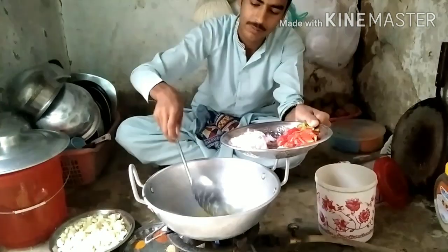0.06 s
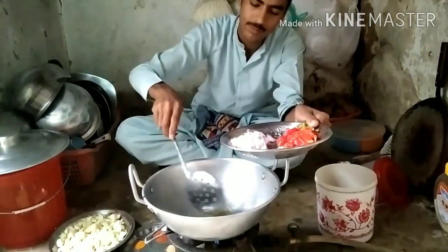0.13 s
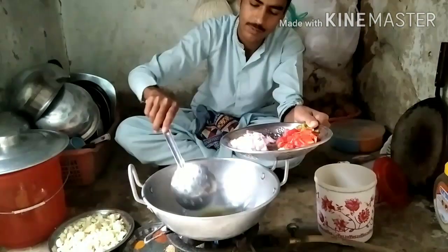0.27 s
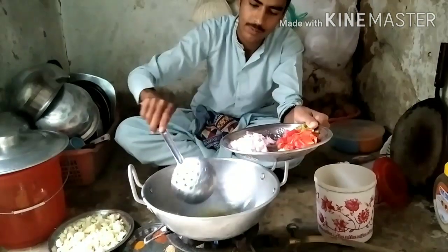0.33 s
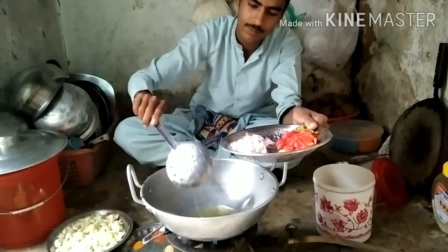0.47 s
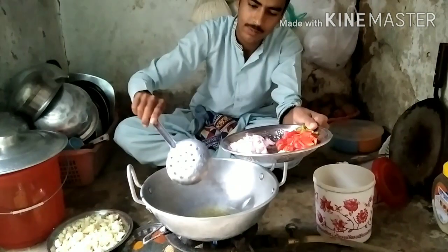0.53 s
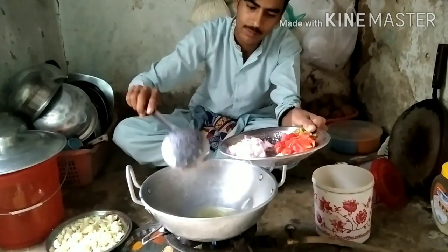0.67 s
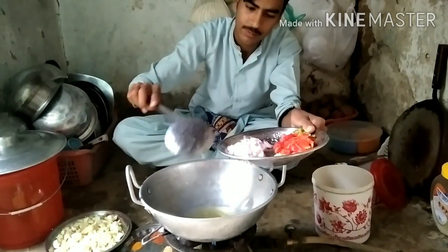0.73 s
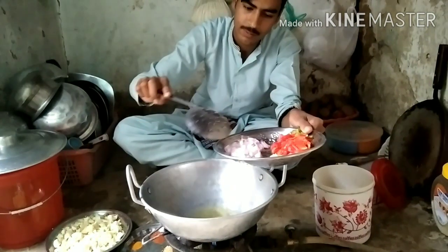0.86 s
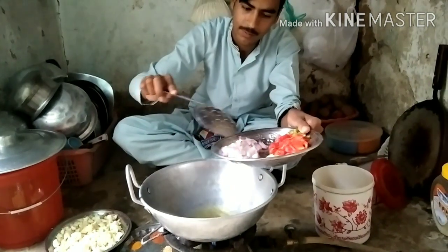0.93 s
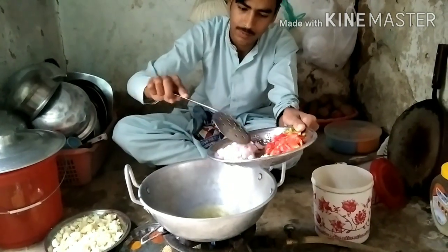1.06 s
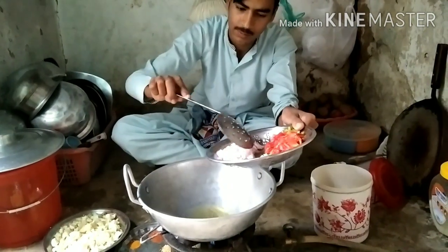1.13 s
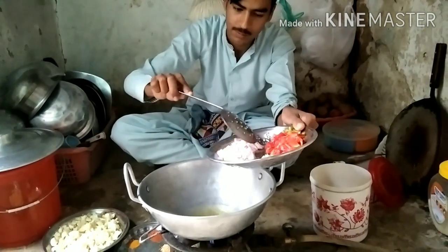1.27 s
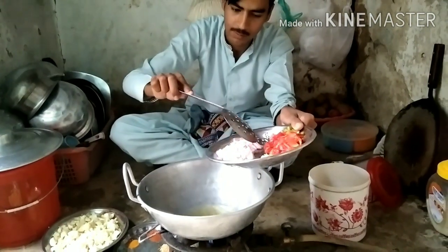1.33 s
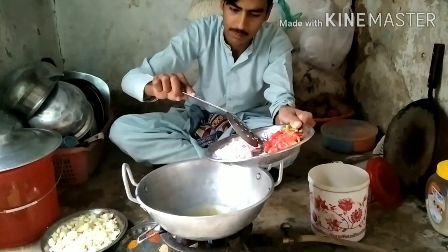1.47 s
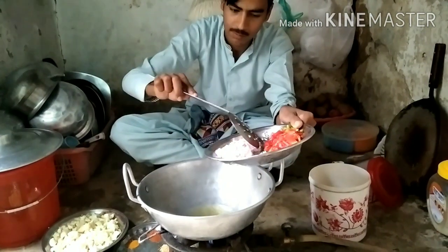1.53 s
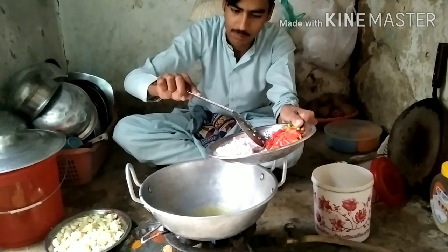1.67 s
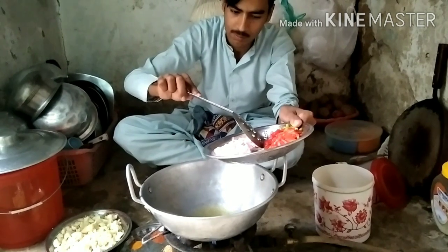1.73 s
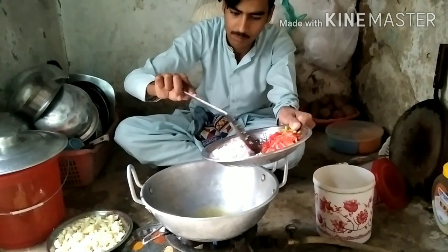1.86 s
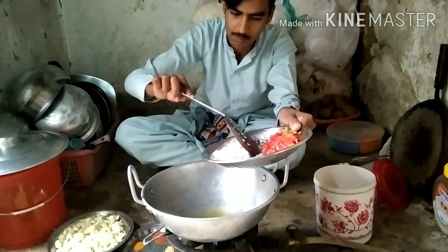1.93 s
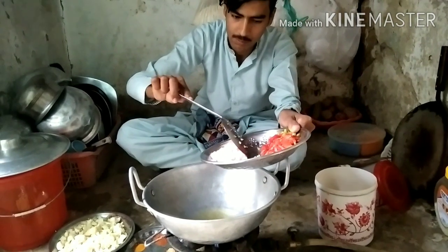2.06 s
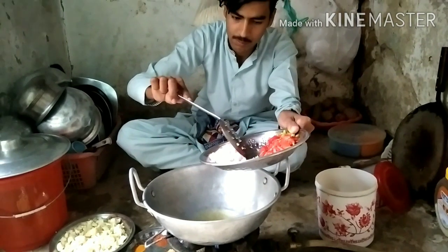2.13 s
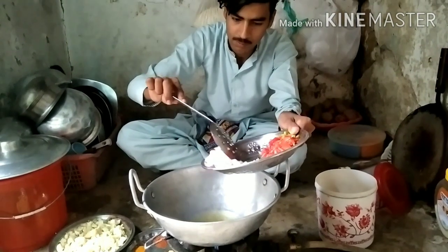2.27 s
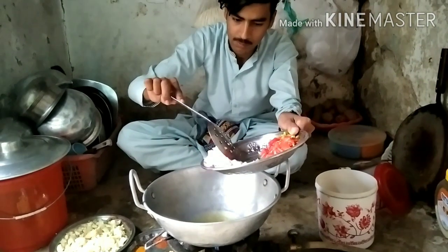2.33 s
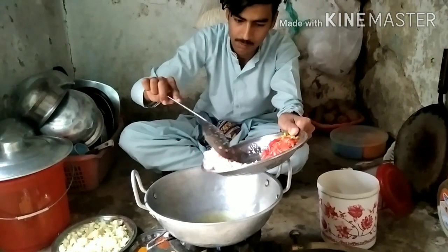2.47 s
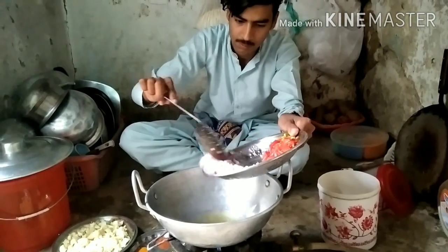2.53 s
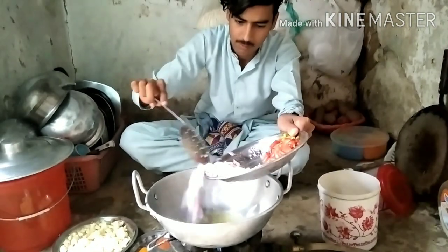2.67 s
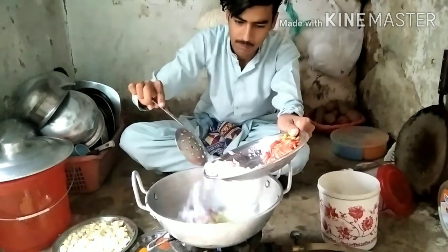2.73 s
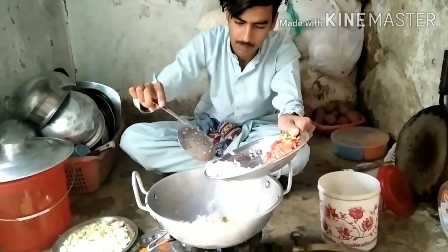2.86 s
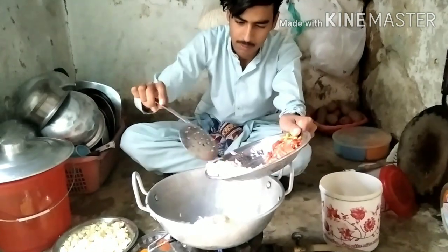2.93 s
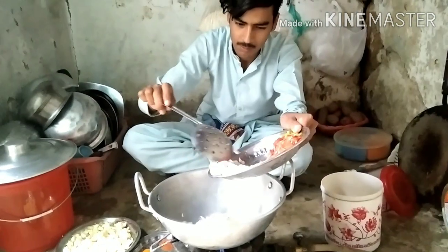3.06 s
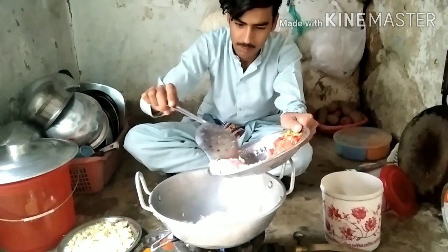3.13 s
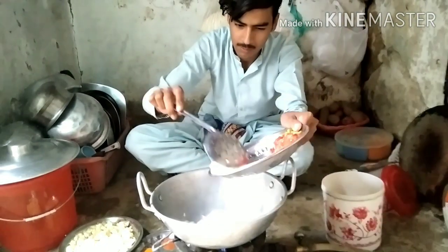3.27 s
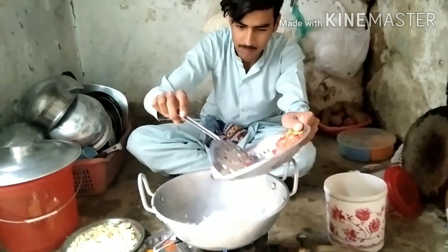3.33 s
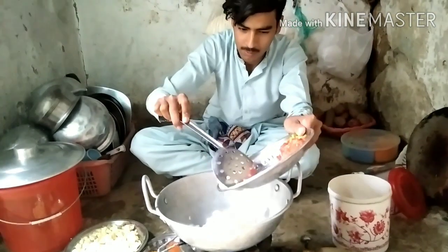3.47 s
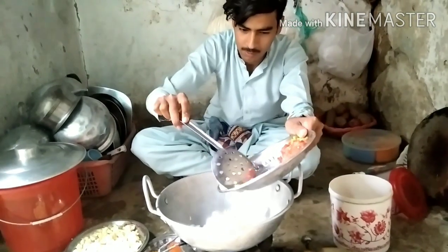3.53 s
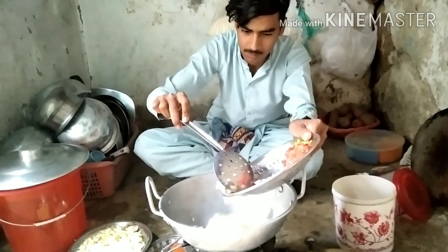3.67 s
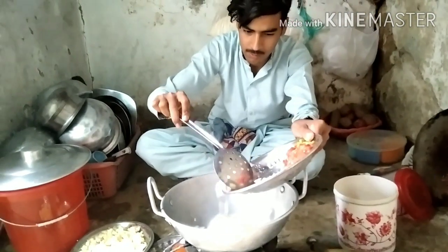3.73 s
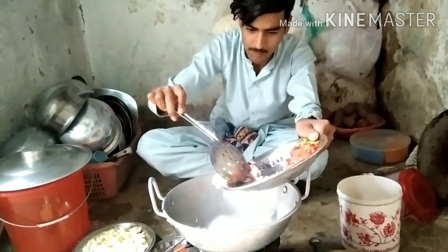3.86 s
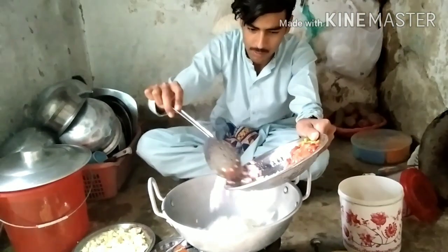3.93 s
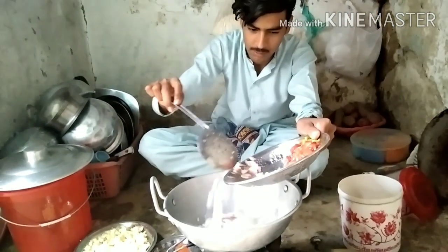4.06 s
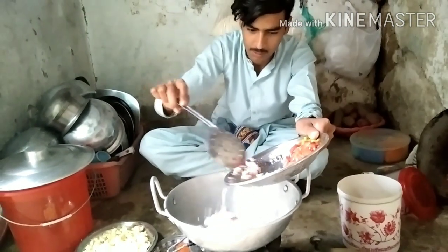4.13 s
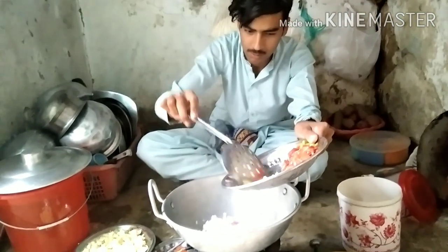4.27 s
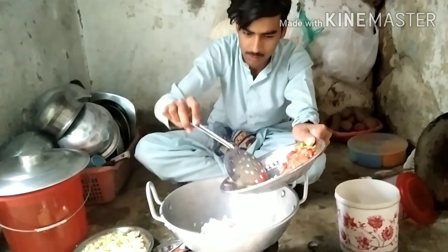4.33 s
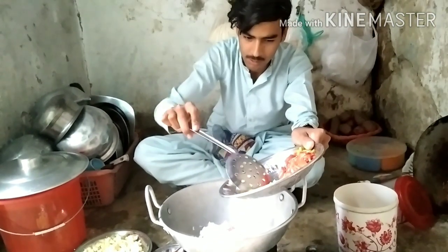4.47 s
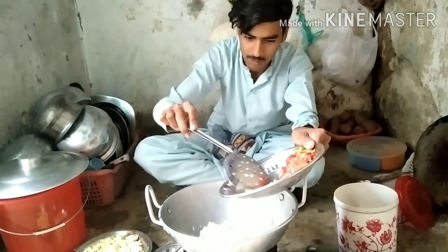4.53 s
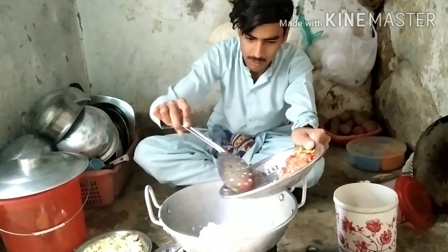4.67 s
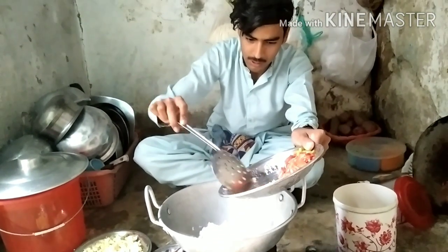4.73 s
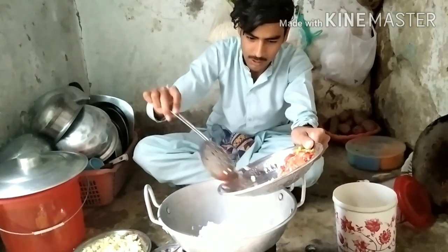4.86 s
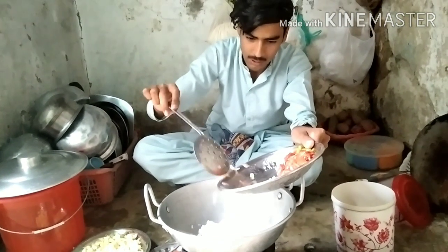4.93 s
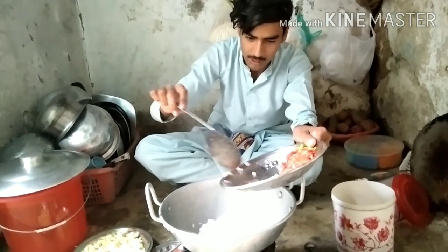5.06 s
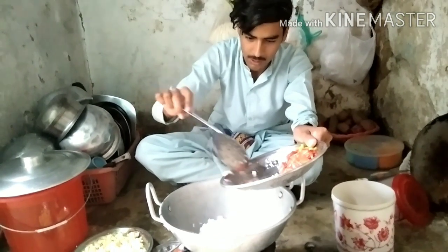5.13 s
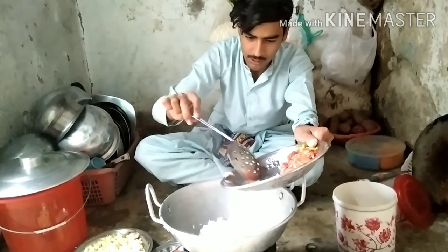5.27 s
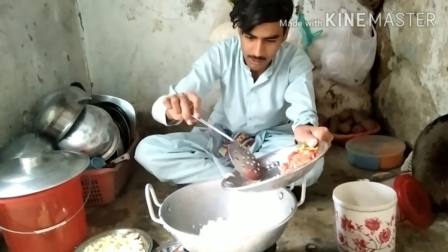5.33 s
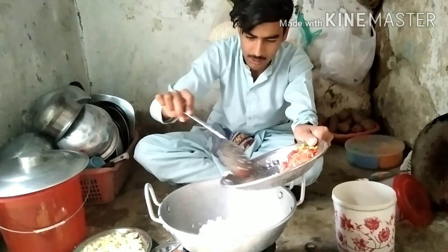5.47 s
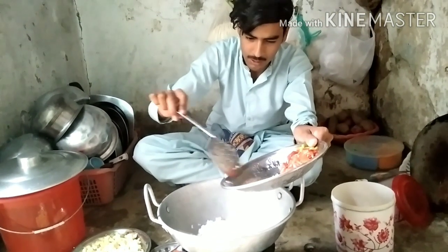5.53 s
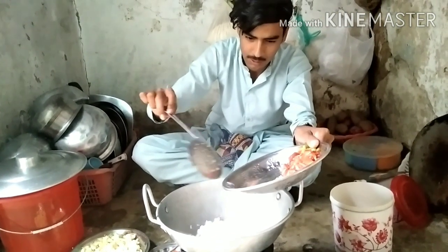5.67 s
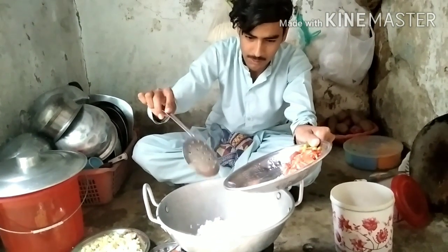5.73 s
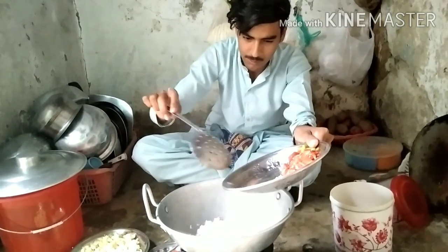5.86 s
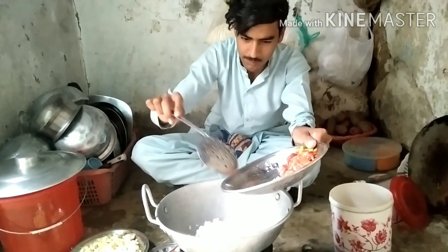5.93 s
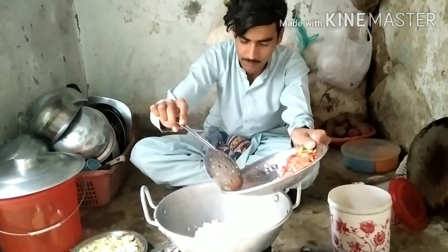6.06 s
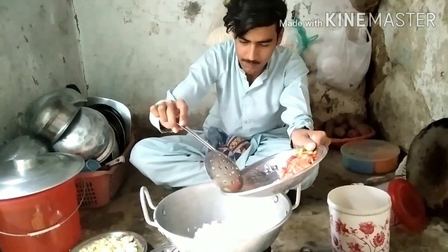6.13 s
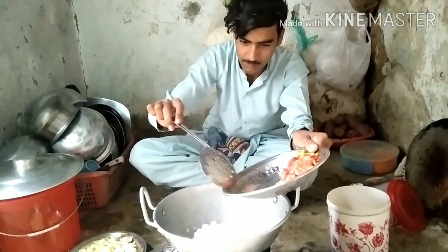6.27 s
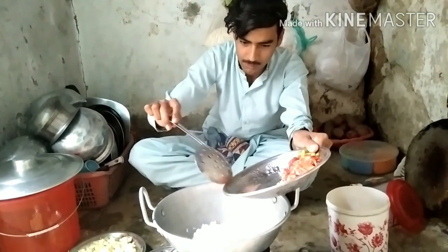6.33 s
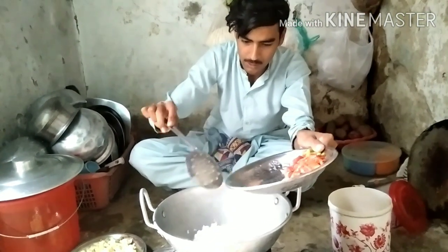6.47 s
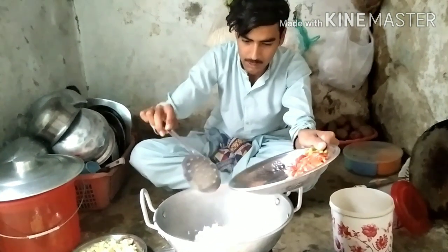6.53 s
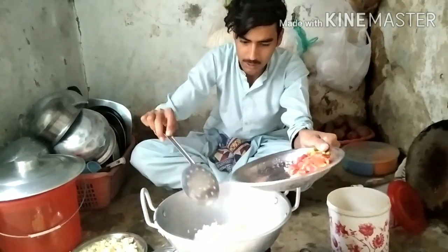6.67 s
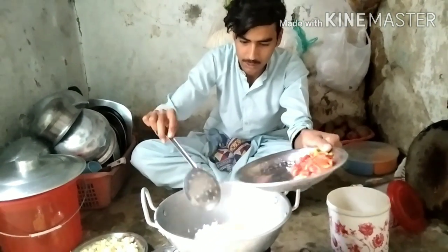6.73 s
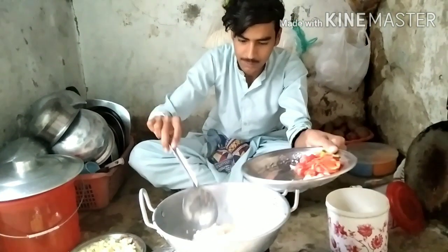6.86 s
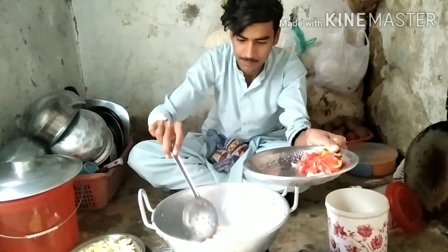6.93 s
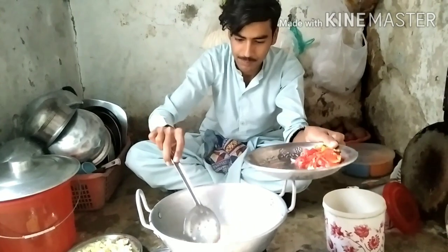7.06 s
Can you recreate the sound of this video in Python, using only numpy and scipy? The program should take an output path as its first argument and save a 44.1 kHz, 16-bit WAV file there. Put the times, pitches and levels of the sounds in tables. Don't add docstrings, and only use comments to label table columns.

```python
import sys
import numpy as np
from scipy import signal
from scipy.fft import rfft, irfft, next_fast_len
from scipy.io import wavfile

SR = 44100
rng = np.random.default_rng(int(sys.argv[2]) if len(sys.argv) > 2 else 0)


def dump_mix(stems):
    frames = np.atleast_2d(stems).T
    limited = np.clip(frames, -1, 1)
    pcm = np.round(limited * 32767).astype(np.int16)
    wavfile.write(sys.argv[1], SR, pcm)


def convert_level_to_amplitude(level_db):
    exponent = np.asarray(level_db, float) / 20
    return 10 ** exponent


N = 312669
SIZE = next_fast_len(N + SR // 10)


def in_time(rows):
    s, *columns = np.transpose(rows)
    return [np.interp(np.arange(N) / SR, s, c) for c in columns]


def at_hz(points, hz):
    point_hz, value = np.transpose(points)
    return np.interp(np.log(hz), np.log(point_hz), value)


def rms_one(x):
    return x / np.sqrt(np.mean(x ** 2) + 1e-20)


def high_pass(x, order, hz):
    return signal.sosfilt(signal.butter(order, hz, "high", fs=SR, output="sos"), x)


def drift(rate_hz):
    hop, settle = 40, 2000
    r = np.exp(-2 * np.pi * rate_hz * hop / SR)
    noise = rng.standard_normal(N // hop + settle + 2)
    slow = signal.lfilter([1], [1, -2 * r, r * r], noise)[settle:]
    return np.interp(np.arange(N) / hop, np.arange(len(slow)), rms_one(slow))


def ring(x, hz, t60_s):
    r = convert_level_to_amplitude(-60 / (t60_s * SR))
    w = 2 * np.pi * hz / SR
    return signal.lfilter([0, np.sin(w)], [1, -2 * r * np.cos(w), r * r], x + 1e-18)


def colour(x, spectrum):
    hz = np.arange(SIZE // 2 + 1) * SR / SIZE + 1
    return irfft(rfft(x, SIZE) * convert_level_to_amplitude(at_hz(spectrum, hz)), SIZE)[..., :N]


def two_ears(mid, side):
    # pitch_hz, correlation (0-1)
    likeness = [(100, .5), (200, .8), (350, .8), (600, .75), (1200, .4), (2500, .25), (5000, .15),
                (9000, .02)]
    hz = np.arange(SIZE // 2 + 1) * SR / SIZE + 1
    alike = at_hz(likeness, hz)
    shared = np.sqrt((1 + alike) / 2) * rfft(mid, SIZE)
    own = np.sqrt((1 - alike) / 2) * rfft(side, SIZE)
    return irfft([shared + own, shared - own], SIZE)[:, :N]


def bubbles(per_s, cycles, spread_db, pitches_hz, patchy_db):
    # pitch_hz, level_db (per Hz)
    sizzle_colour = [(130, -49), (250, -67), (600, -21), (1200, -16.5), (1900, -8), (3000, -4.5),
                     (4000, -3), (4680, -1), (4800, -8), (7400, -5), (7600, -7.5), (10000, -13),
                     (12000, -22), (14500, -30)]
    out = np.zeros((2, N))
    together = drift(11.6)
    chance = rng.random((2, N))
    born = np.nonzero(chance < per_s / SR)
    pick = chance[born] * SR / per_s
    sign = np.sign(pick * 1e4 % 1 - .5)
    size = sign * convert_level_to_amplitude(spread_db * np.minimum(-np.log(pick + 1e-9), 3.3))
    dealt = (pick * 1e2 % 1 * len(pitches_hz)).astype(int)
    for k, hz in enumerate(pitches_hz):
        clicks = np.zeros((2, N))
        clicks[born] = size * (dealt == k)
        froth = convert_level_to_amplitude(patchy_db * (0.78 * together + drift(17.7)))
        out += np.sqrt(hz) * rms_one(ring(clicks, hz, cycles / hz)) * froth
    return colour(two_ears(*out), sizzle_colour)


def frying():
    # time_s, level_db
    fizz_curve = [(1.5, -24), (1.54, -60), (1.69, -49.5), (1.72, -58.5), (1.76, -35.5), (1.86, -40),
                  (1.9, -45.5), (1.95, -42), (2.43, -35.5), (2.67, -41.5), (2.71, -36), (2.75, -25.5),
                  (2.82, -21.5), (2.99, -20.5), (3.02, -18), (3.15, -20.5), (3.3, -22.5), (3.32, -22.5),
                  (3.35, -24.5), (3.38, -21.5), (3.71, -22), (3.77, -24), (3.8, -20.5), (3.83, -23.5),
                  (3.87, -22.5), (3.93, -21), (3.94, -20.5), (3.96, -23.5), (4.04, -21), (4.08, -21.5),
                  (4.19, -19), (5.03, -21.5), (5.1, -20.5), (5.72, -23.5), (5.8, -23), (6.37, -25),
                  (6.42, -24.5), (7.09, -25.5)]
    # time_s, boost_db (above 9.5 kHz)
    mist_curve = [(1.5, 10.5), (2.7, 11), (3, 6.5), (4.5, 7.5), (7.09, 3)]
    # time_s, large_db (re fizz), shake_db (re fizz)
    load_curve = [(1.5, -13, -21), (1.7, -3, -26), (1.76, -19, -16), (1.85, -13, -35), (1.95, -7.5, -39),
                  (2.2, -4, -34), (2.45, -10.5, -28), (2.64, -12, -29), (2.69, -18, -20),
                  (2.77, -16, -24.5), (2.92, -14, -20), (2.97, -19, -27.5), (3.3, -10.5, -25),
                  (3.55, -6, -23), (3.75, -10.5, -21), (3.95, -7, -28), (4.15, -10, -25),
                  (4.4, -1.5, -21.5), (4.6, -5, -19.5), (4.9, -2, -21), (5.15, -5, -23), (5.4, -2.5, -20),
                  (5.65, -2, -19), (5.85, -3, -21.5), (6.1, -3, -21.5), (6.4, -2.5, -20),
                  (6.75, -5.5, -23.5), (7.09, -5.5, -21)]
    (fizz_db,), (mist_db,) = in_time(fizz_curve), in_time(mist_curve)
    large_db, shake_db = in_time(load_curve)
    started = np.clip((np.arange(N) / SR - 1.5) / 0.042, 0, 1)

    fine = bubbles(14000, 5.75, 1.9, np.geomspace(4900, 15000, 7), patchy_db=1.03)
    large = bubbles(2200, 12, 2.8, np.geomspace(700, 4700, 15), patchy_db=2)
    crackle = bubbles(350, 7, 4, np.geomspace(1800, 6500, 5), patchy_db=3)

    fine = rms_one(fine) * convert_level_to_amplitude(fizz_db)
    fine = fine + (convert_level_to_amplitude(mist_db) - 1) * high_pass(fine, 2, 9500)
    heavy = (rms_one(large) + convert_level_to_amplitude(-8.5) * rms_one(crackle)) * convert_level_to_amplitude(fizz_db + large_db)
    return started * (fine + heavy), started * convert_level_to_amplitude(fizz_db + shake_db)


def spits():
    # start_s, peak_db, pitch_hz, length_s
    clusters = [(2.754, -12.5, 4400, 0.027), (2.81, -19, 5540, 0.031), (2.815, -24, 6460, 0.023),
                (2.946, -9.5, 4350, 0.022), (3.009, -19.5, 2320, 0.061), (3.096, -26, 6460, 0.031),
                (3.156, -5.5, 2420, 0.021), (3.246, -12.5, 3930, 0.037), (3.315, -11, 6420, 0.017),
                (3.373, -22, 1710, 0.02), (3.39, -15, 4700, 0.017), (3.44, -19, 3790, 0.084),
                (3.439, -18, 2220, 0.065), (3.468, -17, 6400, 0.036), (3.551, -15, 3170, 0.015),
                (3.552, -14, 5030, 0.038), (3.647, -11, 3440, 0.031), (3.643, -15, 6300, 0.022),
                (3.645, -18.5, 1930, 0.039), (3.688, -14, 3840, 0.017), (3.774, -18, 4650, 0.029),
                (3.847, -14, 4260, 0.068), (3.891, -11.5, 3340, 0.02), (3.892, -13, 5460, 0.059),
                (3.929, -19, 2030, 0.025), (3.932, -14, 5300, 0.014), (3.969, -15.5, 2360, 0.014),
                (4.023, -10.5, 6420, 0.026), (4.077, -7.5, 4500, 0.014), (4.09, -13, 3200, 0.015),
                (4.29, -30, 1270, 0.071), (4.316, -16, 2770, 0.096), (4.336, -15, 3860, 0.097),
                (4.347, -27, 2650, 0.11), (4.408, -13, 2630, 0.016), (4.477, -16, 5380, 0.014),
                (4.566, -14, 4270, 0.079), (4.608, -10, 2900, 0.016), (4.596, -30, 4220, 0.082),
                (4.615, -20, 5030, 0.082), (4.807, -21, 2410, 0.085), (4.87, -17.5, 2070, 0.045),
                (4.875, -18, 3850, 0.032), (4.899, -18, 2520, 0.051), (4.947, -15, 4400, 0.12),
                (4.948, -18, 2920, 0.11), (5.196, -15, 4570, 0.048), (5.215, -14, 4690, 0.042),
                (5.243, -15.5, 2630, 0.062), (5.365, -8.5, 2810, 0.019), (5.38, -26, 2820, 0.049),
                (5.548, -28, 1520, 0.021), (5.553, -18, 3570, 0.064), (5.562, -13, 4100, 0.031),
                (5.61, -17, 2630, 0.019), (5.653, -20, 1643, 0.016), (5.77, -24, 3450, 0.02),
                (5.906, -15.5, 3740, 0.025), (5.97, -19, 4690, 0.042), (6.074, -12.5, 2030, 0.021),
                (6.066, -11.5, 4010, 0.052), (6.213, -15, 4180, 0.039), (6.363, -14.5, 2170, 0.028),
                (6.492, -15.5, 4240, 0.068), (6.608, -17, 3900, 0.043), (6.82, -19, 2860, 0.069),
                (3.155, -8, 4250, 0.011), (3.4605, -7.5, 3670, .01), (3.6466, -8.5, 2640, 0.017),
              (3.894, -8, 4060, 0.013), (4.3277, -22, 3750, 0.0066), (4.822, -12, 4570, 0.011),
              (5.355, -29, 3000, .01), (5.402, -9.5, 2760, 0.014), (5.5454, -14.5, 1840, .02),
              (5.572, -23, 1880, 0.035), (5.658, -12.5, 1830, 0.024), (5.272, -14, 2880, 0.0068),
              (5.495, -14, 4360, .01), (5.786, -15.5, 2980, .01), (6.162, -15, 4020, 0.012),
                (2.731, -16, 4560, 0.005), (2.764, -11, 4570, 0.005), (2.947, -14, 4450, 0.005),
                (2.9837, -16, 4550, 0.005), (3.161, -5, 4100, 0.005), (3.319, -22, 4340, 0.005),
                (3.4, -8, 4560, 0.005), (3.475, -11, 4550, 0.005), (3.557, -4.5, 4240, 0.005),
                (3.65, -3, 3800, 0.005), (3.696, -4, 4360, 0.005), (3.816, -10, 4200, 0.005),
                (3.861, -10, 4350, 0.005), (3.901, -8.5, 3530, 0.005), (3.969, -15.5, 2520, 0.005),
                (4.0289, -9, 4650, 0.005), (4.048, -17, 4190, 0.005), (4.0753, -17, 4600, 0.005),
                (4.16, -14, 4660, 0.005), (4.618, -18, 2820, 0.005), (4.652, -16, 4550, 0.005),
                (4.818, -12, 4680, 0.005), (4.8754, -8, 3900, 0.005), (4.9203, -8, 2900, 0.005),
                (5.1952, -11, 4350, 0.005), (5.274, -9.5, 2900, 0.005), (5.332, -22, 3770, 0.005),
                (5.369, -12.5, 2590, 0.005), (5.408, -18, 2950, 0.005), (5.4995, -14, 4550, 0.005),
                (5.5479, -11.5, 3800, 0.005), (5.6232, -10, 2730, 0.005), (5.6593, -15, 1846, 0.005),
                (5.768, -21, 4090, 0.005), (5.786, -17, 3540, 0.005), (5.908, -9, 3550, 0.005),
                (5.9749, -13, 4630, 0.005), (6.1655, -11, 4130, 0.005), (6.213, -12, 4070, 0.005),
                (6.4184, -15, 3790, 0.005), (6.619, -16, 4090, 0.005), (6.76, -16, 4150, 0.005)]
    out = np.zeros((2, N + SR))
    t = np.arange(500) / SR
    for start_s, peak_db, hz, length_s in clusters:
        when, size, ear = rng.random((3, 60))
        length_s = min(length_s, .12)
        octaves = min(.008 / length_s, 1)
        for k in range(int(4 + 450 * length_s)):
            f = hz * 2 ** (octaves * ((.5 + .618 * k) % 1 - .5))
            chirp = np.sin(2 * np.pi * f * t * (1 + 6 * t))
            pop = chirp * (1 - np.exp(-t * f)) * np.exp(-t * f / 6)
            delay_s = when[k] ** 1.3 * 1.2 * length_s * (k > 0)
            at = int((start_s + delay_s) * SR)
            lag = int(9 * ear[k])
            gain = convert_level_to_amplitude(peak_db - 0.15 - 5.0 * size[k]) * np.exp(-.9 * delay_s / length_s)
            out[0, at:at + len(t)] += gain * pop
            out[1, at + lag:at + lag + len(t)] += gain * pop
    return high_pass(out[:, :N] + 1e-18, 2, 900)


def drops():
    # start_s, crack_db, hiss_db, hiss_t60_s, lowest_hz, rise_s
    lone_drops = [(0.0, -70, -47.5, 0.14, 1770, 0.00081), (.15, -80, -55.5, 0.18, 3500, 0.0097),
                  (0.442, -48, -52, 0.09, 5000, .001), (.4452, -29, -61, .15, 6000, .001),
                  (.4486, -36, -65, 0.091, 6040, .001), (0.608, -47, -56, .05, 5000, .001),
                  (0.7, -56, -47, .15, 494, 0.0014), (0.866, -50, -45.5, 0.27, 500, 0.0013),
                  (1.044, -70, -52, 0.11, 3020, .008), (1.053, -54, -49.5, 0.12, 1500, .002),
                  (1.152, -70, -47, 0.42, 4840, 0.0077), (1.294, -41, -40.5, 0.18, 1860, 0.0015),
                  (1.385, -72, -52, 0.26, 2300, 0.0091), (1.4694, -14, -30.5, 0.11, 2070, 0.0024),
                  (1.741, -40, -41, 0.09, 1500, .001), (2.731, -30, -35, 0.089, 1510, .001)]
    crack_hz = 9440
    out = np.zeros((2, N))
    t = np.arange(SR // 2) / SR
    noise = two_ears(*rng.standard_normal((2, N)))
    hiss = rms_one(colour(noise, [(300, -12), (4700, -8.5), (4850, -7.5), (14000, -21)]))
    for start_s, crack_db, hiss_db, t60_s, lowest_hz, rise_s in lone_drops:
        at = int(start_s * SR)
        shape = (1 - np.exp(-t / rise_s)) * convert_level_to_amplitude(hiss_db - 60 * t / t60_s)
        burst = hiss[:, at:at + len(t)] * shape
        burst += convert_level_to_amplitude(crack_db) * np.sin(2 * np.pi * crack_hz * t) * np.exp(-t * 2500)
        out[:, at:at + len(t)] += high_pass(burst, 2, lowest_hz)
    return out


def jets():
    # start_s, end_s, pitch_hz, width_hz, level_db
    narrow_jets = [(0.71, 1.04, 2070, 260, -62), (.72, 1.003, 1540, 160, -64), (.72, 1.01, 750, 250, -66),
                   (.865, .93, 2100, 250, -62), (0.86, 0.896, 1520, 150, -56),
                   (1.29, 1.336, 4500, 800, -49), (1.305, 1.35, 8900, 3000, -63),
                   (0.846, 0.94, 4550, 400, -58), (1.739, 1.761, 3100, 500, -39),
                   (1.763, 1.892, 7200, 900, -41), (1.9, 2.18, 4760, 870, -41.5),
                   (2.085, 2.314, 4400, 1200, -55), (3.369, 3.424, 656, 90, -36.5)]
    out = np.zeros((2, N))
    t = np.arange(N) / SR
    noise = two_ears(*rng.standard_normal((2, N)))
    for start_s, end_s, hz, width_hz, level_db in narrow_jets:
        on = slice(int(start_s * SR), int(end_s * SR))
        progress = ((t[on] - start_s) / (end_s - start_s)).clip(0, 1)
        swell = np.sin(np.pi * progress) ** 0.63
        tone = ring(ring(noise[:, on], hz, 1 / width_hz), hz, 2 / width_hz)
        out[:, on] += convert_level_to_amplitude(level_db) * swell * rms_one(tone)
    return out


def pan(shaking):
    # pitch_hz, struck_db, t60_s, shaken_db
    modes = [(251.5, -3, .3, -28.5), (310, -28, .1, -45), (355, 0, .13, -39), (390, -5, 0.2, -38),
             (482, -2.5, 0.21, -21), (496, 13, 0.089, -8), (560, 15, 0.13, -17), (633, -11, 0.3, -20),
             (660, 6.5, 0.085, -9), (720, -6, 0.11, -19), (809, -42, 0.038, -1.5), (937, -15, .08, -14.5),
             (1266, -29, .08, -7), (1450, -34, .08, 1), (1540, -45, .08, -50), (1980, -14, .08, -35),
             (2770, -41, .08, 6)]
    # start_s, peak_db, lowest_mode_db (extra share)
    knocks = [(.702, -71, 6), (.868, -68.5, -9), (1.295, -48, 7), (1.74, -65, 5), (2.673, -59, 6),
              (2.734, -53.5, -3), (3.383, -54.5, 4), (4.046, -56.5, -14), (4.169, -59, -13),
              (5.332, -65.5, 21.5), (6.075, -55.5, -8)]
    start_s, peak_db, lowest_db = np.transpose(knocks)
    at = (start_s * SR).astype(int)
    luck_db = 2 * rng.standard_normal((len(knocks), len(modes)))
    noise = rng.standard_normal((2, N))
    struck, shaken = np.zeros(N), np.zeros((2, N))
    for k, (hz, struck_db, t60_s, shaken_db) in enumerate(modes):
        force = np.zeros(N)
        force[at] = convert_level_to_amplitude(peak_db + struck_db + lowest_db * (hz < 280) + luck_db[:, k])
        struck += ring(force, hz, min(t60_s, 70 / hz))
        shaken += convert_level_to_amplitude(shaken_db) * rms_one(ring(noise, hz, .16))
    for lag_s, bounce_db in [(.011, -4.5), (.021, -4.5), (.033, -11.5)]:
        lag = int(lag_s * SR)
        struck[lag:] += convert_level_to_amplitude(bounce_db) * struck[:-lag]
    shaken = two_ears(*shaken) * shaking * convert_level_to_amplitude(-4.5)
    return high_pass(struck, 4, 215), high_pass(shaken, 4, 215)


def burner():
    # pitch_hz, level_db (per Hz)
    flame = [(18, -47), (30, -40), (91, -1.5), (145, -6.5), (174, -19), (214, -15), (292, -9), (350, -11.5),
             (398, -10), (1150, -13.5), (1410, -9), (1570, -14), (2140, -15), (9840, -22), (14500, -28)]
    # pitch_hz, width_hz, level_db
    hum = [(205.4, 6.3, -74), (2150, 370, -79.5)]
    # time_s, pitch_hz, level_db
    ladle = [(0.03, 1316, -95), (.1, 1410, -69), (.3, 1440, -74), (.45, 1430, -82), (.6, 1440, -98)]
    mid, side = rng.standard_normal((2, N))
    out = convert_level_to_amplitude(-67) * rms_one(colour(two_ears(mid, side), flame))
    for hz, width_hz, level_db in hum:
        out += convert_level_to_amplitude(level_db) * rms_one(ring(side, hz, 10 / width_hz))
    hz, level_db = in_time(ladle)
    return out + convert_level_to_amplitude(level_db + 2 * drift(20)) * np.sin(2 * np.pi * np.cumsum(hz) / SR)


def kitchen(x, t60_s, wet_db):
    t = np.arange(SR // 10) / SR
    tail = rng.standard_normal((2, len(t))) * convert_level_to_amplitude(-60 * t / t60_s) * (t > .003)
    tail = tail / np.sqrt(np.sum(tail ** 2, axis=1, keepdims=True))
    return x + convert_level_to_amplitude(wet_db) * irfft(rfft(x, SIZE) * rfft(tail, SIZE), SIZE)[:, :N]


def scene():
    sizzle, shaking = frying()
    struck, shaken = pan(shaking)
    sudden = kitchen(spits() + drops() + struck, t60_s=.14, wet_db=-7)
    return sizzle + shaken + jets() + sudden + burner()


def band_limit(x):
    return signal.sosfilt(signal.butter(12, 15590, fs=SR, output="sos"), x)


def record(dry):
    # pitch_hz, difference_db
    left_over_right = [(60, 9.5), (120, 13.5), (200, 13), (380, 8), (700, -1.5), (2400, 0), (4400, -1.5),
                       (6500, -5.5), (9000, 5), (14000, 5)]
    half = np.array(left_over_right) * [1, .5]
    mix = np.array([colour(dry[0], half), colour(dry[1], half * [1, -1])])
    mix = colour(mix, [(14450, 0), (14600, -55), (16000, -70)])
    return band_limit(mix)


dry = scene()
out = record(dry)
dump_mix(out)
```